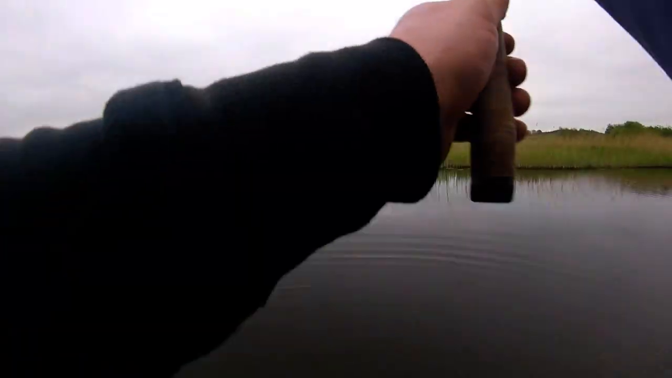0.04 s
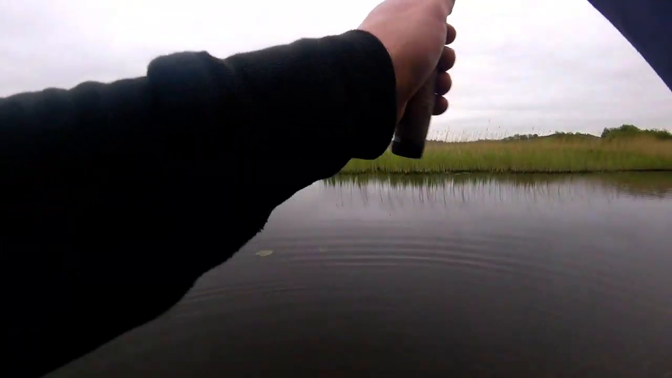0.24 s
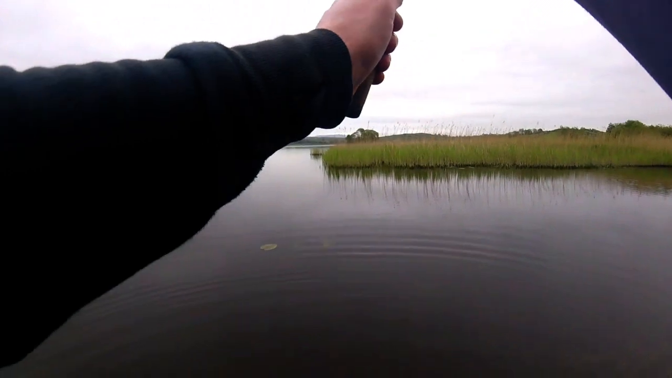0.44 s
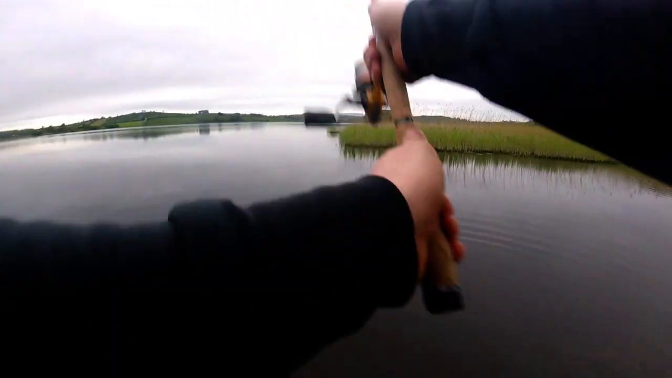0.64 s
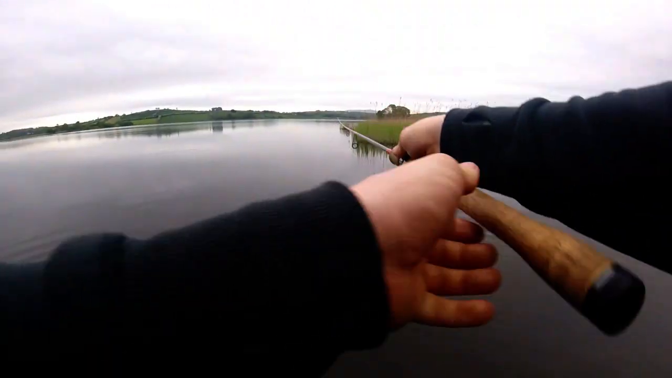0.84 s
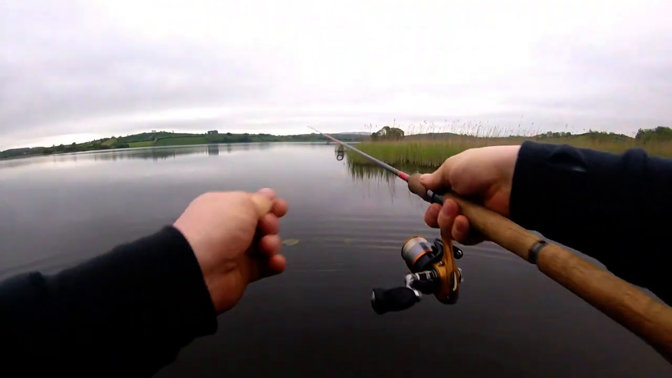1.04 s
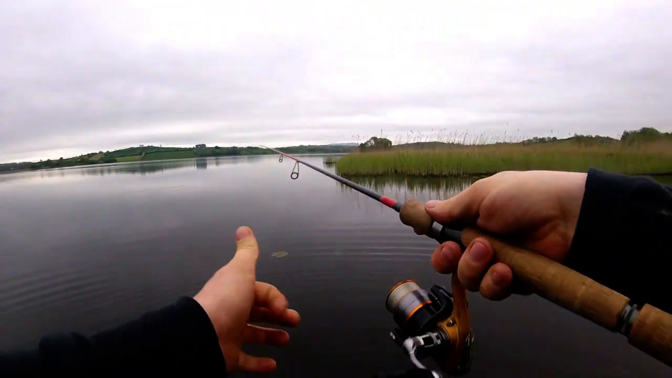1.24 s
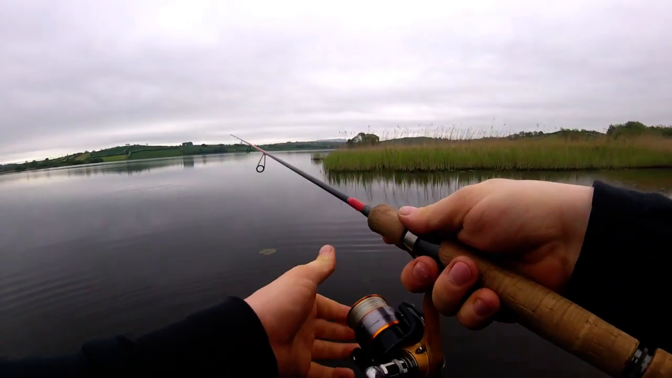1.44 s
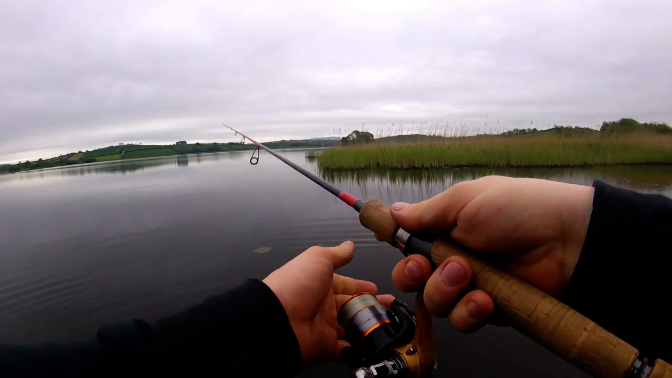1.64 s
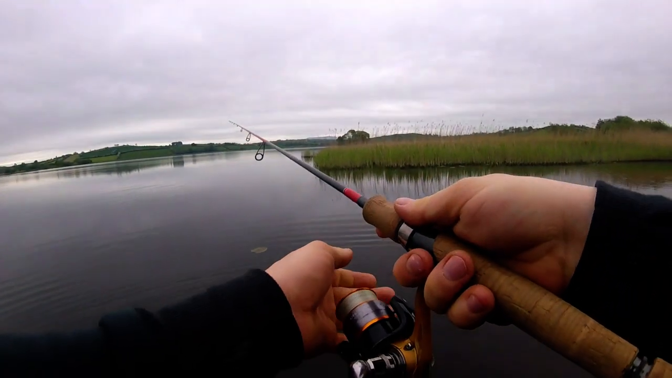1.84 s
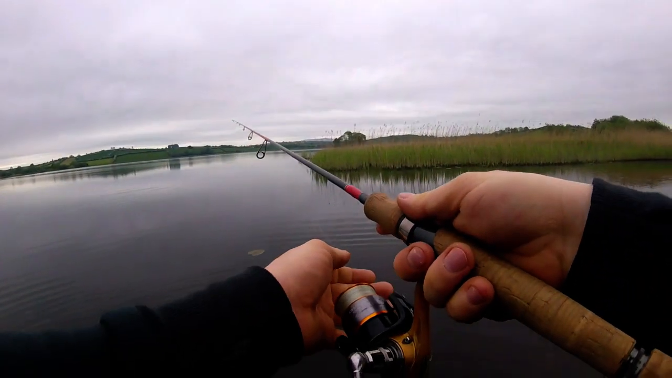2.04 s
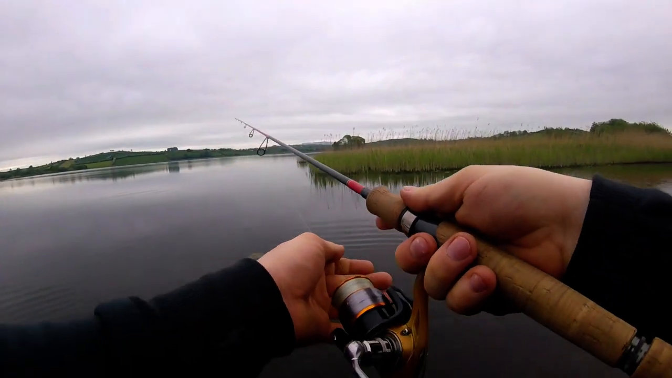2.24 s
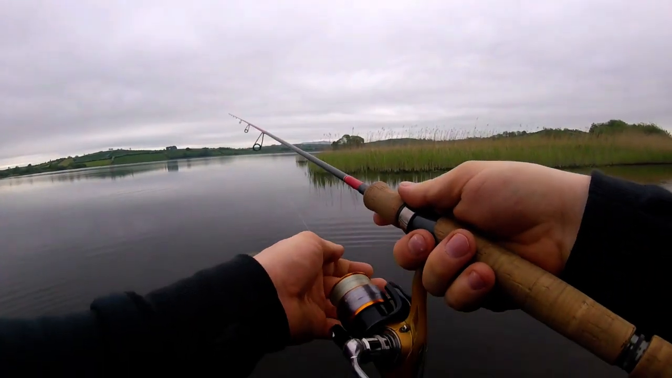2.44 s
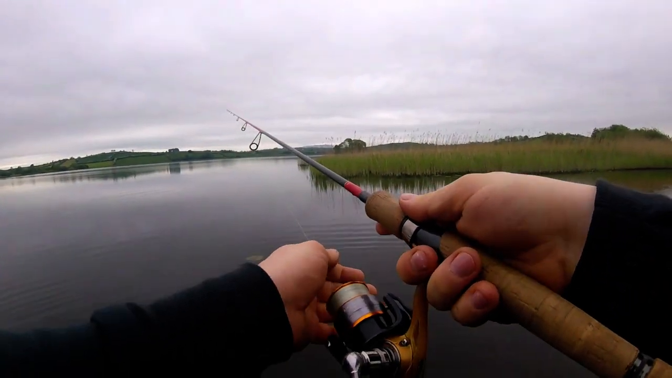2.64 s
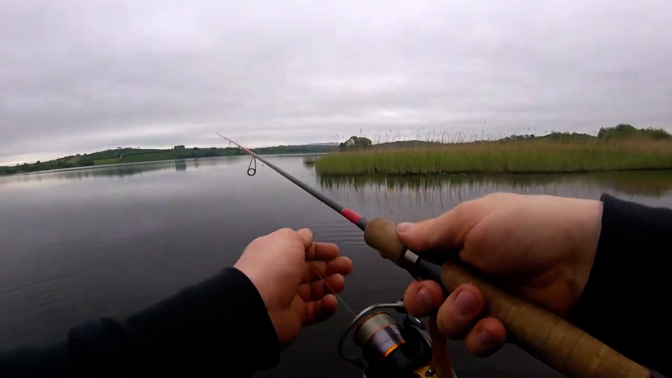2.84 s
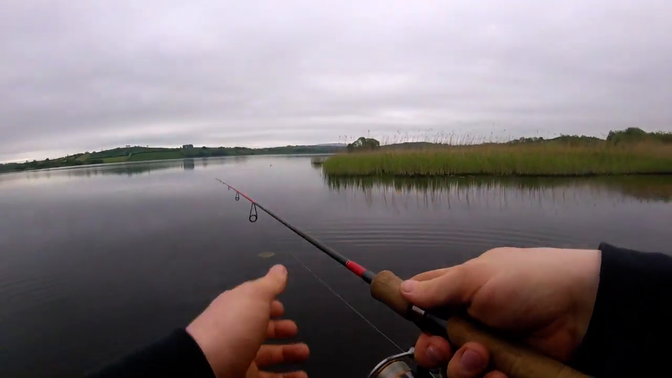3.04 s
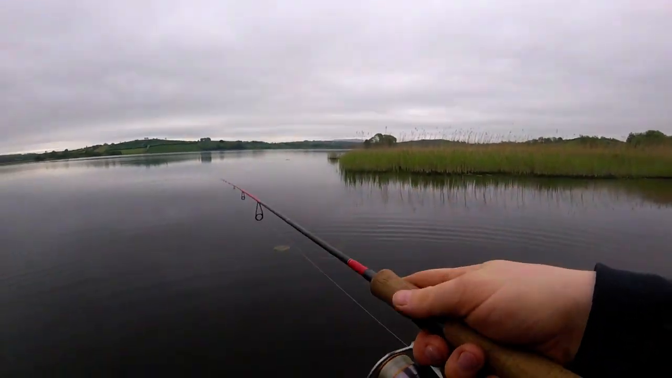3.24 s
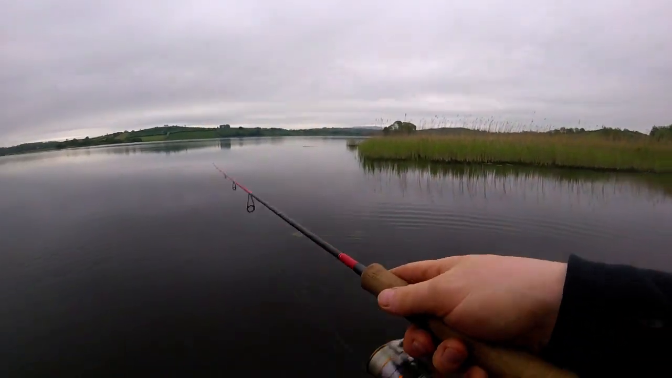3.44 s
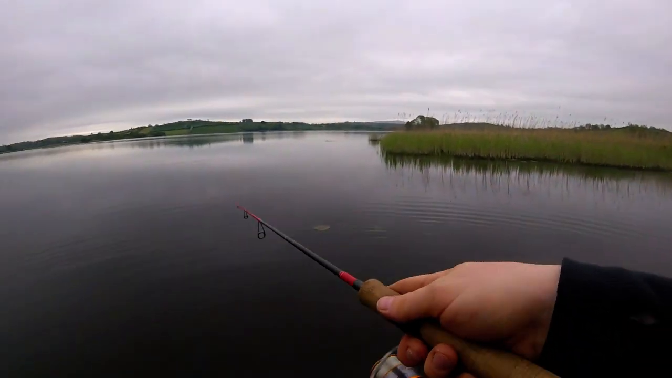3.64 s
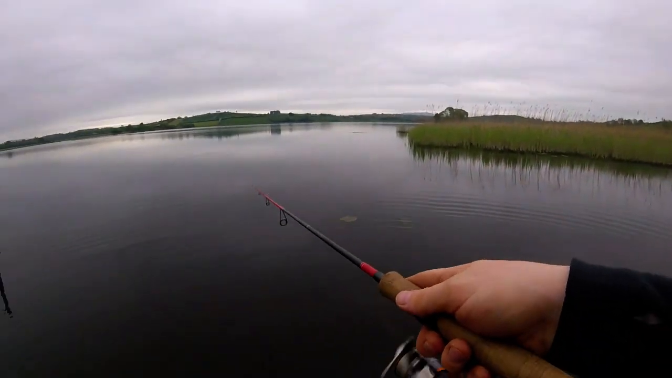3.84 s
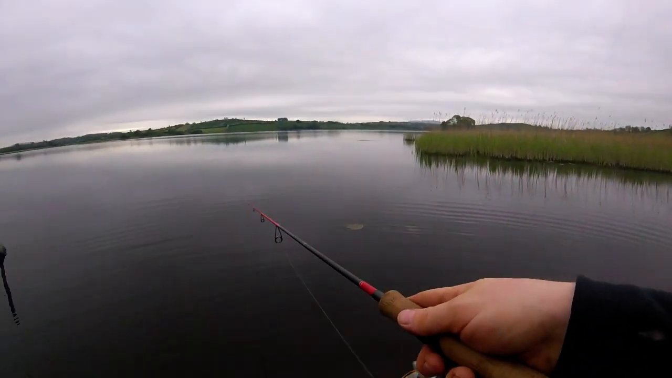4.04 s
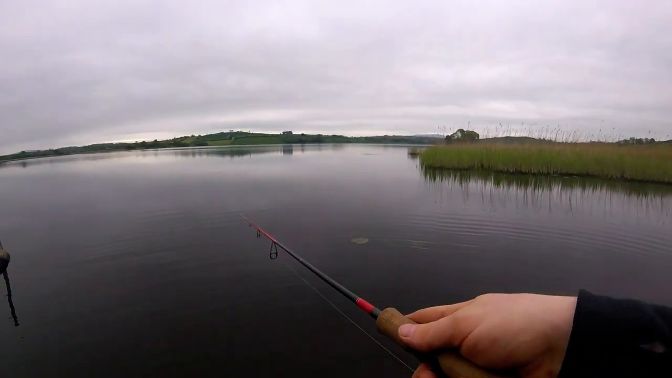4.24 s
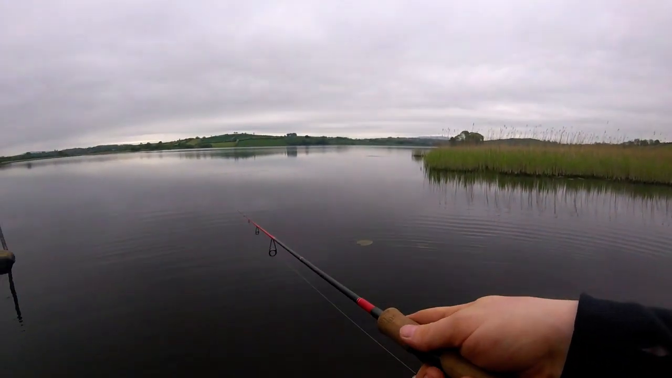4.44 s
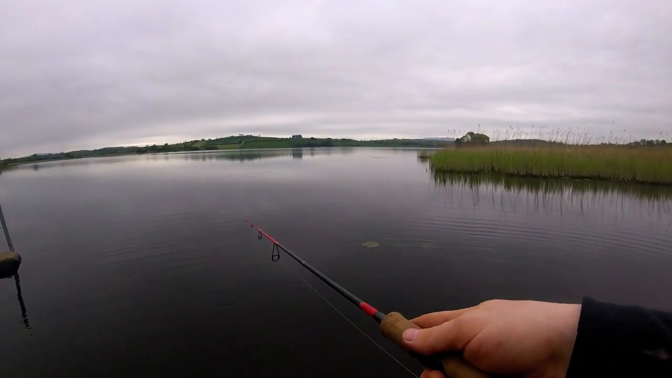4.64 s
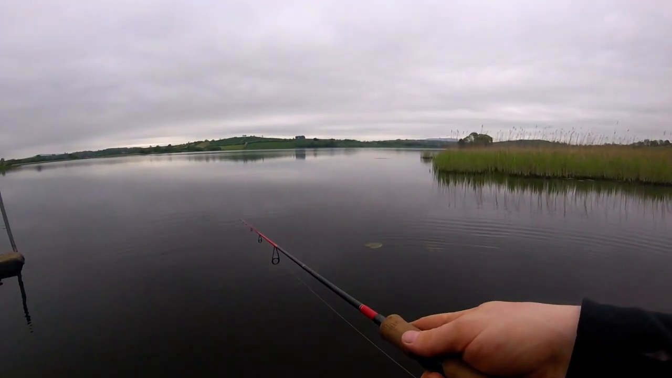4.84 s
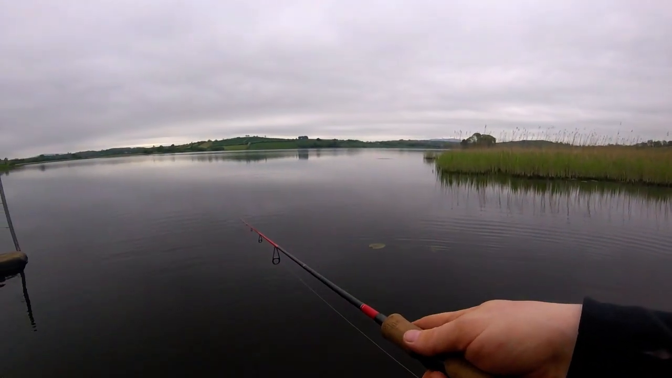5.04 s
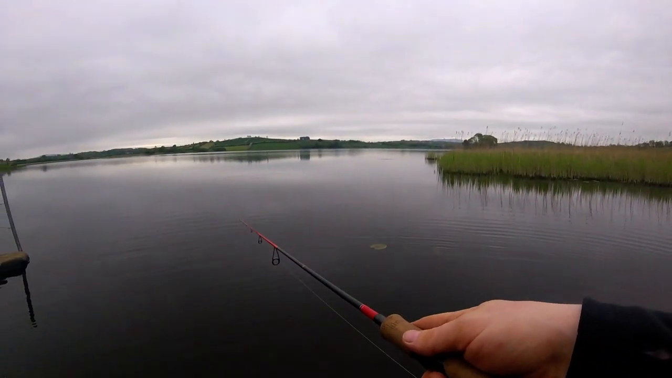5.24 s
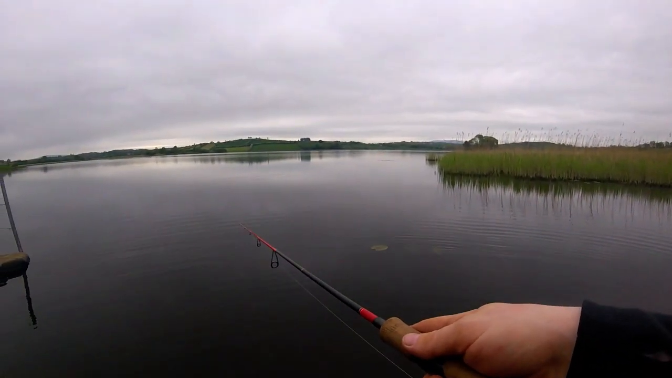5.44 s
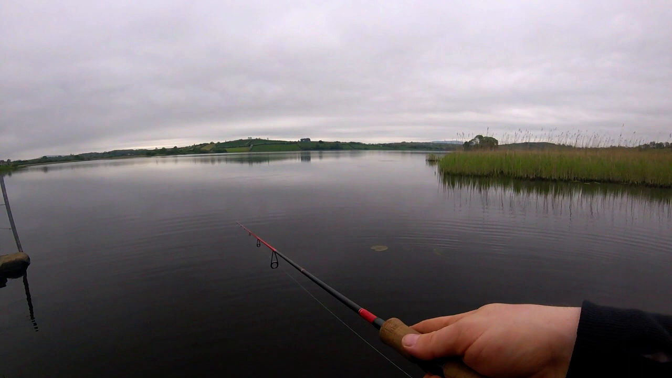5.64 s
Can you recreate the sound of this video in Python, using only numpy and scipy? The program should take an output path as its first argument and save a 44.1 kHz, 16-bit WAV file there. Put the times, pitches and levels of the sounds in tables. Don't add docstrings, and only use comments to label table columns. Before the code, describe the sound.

Close, wind-buffeted outdoor recording of a cast over still water. Sleeves rustle softly, the handle knocks, the rod whips and line slaps the guides in a quick crackle. Line sings very faintly off the spool with sparse clicks, while a small bird trills. The reel bail slams with a rattling metal clatter, then faint taps, soft wind rumble and fluting birds continue.

```python
import sys
import numpy as np
from scipy import signal
from scipy.io import wavfile
from scipy.ndimage import uniform_filter1d

SR = 44100
rng = np.random.default_rng(int(sys.argv[2]) if len(sys.argv) > 2 else 0)


def master(y):
    cut = np.clip(np.atleast_2d(y).T, -1, 1)
    pcm = np.round(cut * 32767)
    wavfile.write(sys.argv[1], SR, pcm.astype(np.int16))


def decibels_to_gain(level_db):
    exponent = np.asarray(level_db, float) / 20
    return 10 ** exponent


N = 251370

# (peak time [s], peak level [dB], rise per 10 dB [s], fall per 10 dB [s])
GUSTS = [(.17, -40, .1, .06), (.28, -40, .03, .2), (.56, -47, .2, .15), (.76, -33.5, .035, .055),
         (1.0, -33, .09, .045), (1.09, -43, .04, .1), (1.19, -41, .1, .06), (1.36, -38.5, .13, .15),
         (1.475, -32, .1, .06), (1.84, -49, .2, .1), (2.28, -42.5, .1, .07), (2.51, -48, .15, .1),
         (2.72, -48, .1, .05), (2.8, -44, .04, .3), (3.04, -47, .05, .2), (3.43, -41.5, .07, .11),
         (3.68, -35, .05, .04), (3.82, -36, .07, .35), (4.17, -37, .13, .05), (4.29, -38.5, .05, .5),
         (4.62, -39.5, .5, .15), (4.97, -43, .15, .1), (5.16, -43, .15, .2), (5.34, -44, .06, .25),
         (5.7, -43, .4, .1)]
# (peak time [s], peak level [dB], rise per 10 dB [s], fall per 10 dB [s])
SLEEVES = [(0, -53, .1, .06), (.47, -49, .3, .3), (.85, -50.5, .15, .45), (1.4, -58, .5, .2),
           (1.82, -60, .15, .08), (2.3, -63, .5, .6), (3.17, -49.5, .19, .11), (3.34, -57.5, .05, .07),
           (3.78, -61, .3, .08), (4.38, -63, .6, .5), (5.7, -63, .2, .1)]
# (peak time [s], peak level [dB], rise per 10 dB [s], fall per 10 dB [s])
FAR_SONG = [
    (1.2, -62.5, 1.1, 1.0),
    (1.68, -64, .5, .3),
    (2.78, -66, 2.0, .15),
    (3.15, -72, .4, .8),
    (3.71, -74, .4, .5),
    (4.78, -74, .9, .6),
    (5.7, -75, .6, .1),
]
GUST_REST_DB, SLEEVE_REST_DB, FAR_SONG_REST_DB = -50.5, -65, -82
# (frequency [Hz], density [dB per Hz])
RUMBLE = [(12, -29), (20, -1), (43, 4.5), (62, -1), (97, -6), (125, -14.5), (265, -30.5), (300, -35.5),
          (390, -77), (660, -120)]
# (frequency [Hz], density [dB per Hz])
ROAR = [(76, -44), (130, 1.5), (400, -3.5), (640, -6), (1600, -19.5), (1880, -22.5), (2500, -30),
        (3250, -57.5), (5500, -120)]
# (frequency [Hz], density [dB per Hz])
CHORUS = [(1500, -68), (2500, -2), (3500, -8.5), (4800, -2.5), (5800, -1.5), (6500, -8), (9000, -51)]
# (frequency [Hz], density [dB per Hz])
HISS = [(180, -33), (300, -2), (413, -4.5), (684, -7), (834, -4), (900, -5), (1610, -8.5), (2250, -9.5),
        (3240, -13), (4400, -24), (5950, -13.5), (6500, -1.5), (6950, -9), (10800, -21.5), (11500, -34),
        (15000, -67), (22000, -120)]
HISS_DB = -61

# (time [s], pitch [Hz], level [dB])
FLUTING = [
    [(4.933, 2720, -59.5), (4.957, 2830, -64), (5.003, 2530, -55), (5.055, 2260, -56), (5.123, 2020, -65),
     (5.14, 2108, -71)],
    [(5.3, 2680, -61), (5.324, 2500, -60), (5.37, 2390, -57), (5.436, 2310, -55.5), (5.46, 2274, -57),
     (5.586, 2213, -57.5), (5.63, 2196, -69)],
    [(.25, 1600, -74), (.33, 1760, -69), (.4, 1830, -70), (.43, 1840, -61.5), (.51, 1835, -61),
     (.52, 1830, -68)],
    [(.634, 1880, -59), (.66, 2130, -56), (.683, 2330, -54), (.698, 2350, -55)],
    [(1.966, 4780, -68), (1.985, 4450, -62), (2.0, 4320, -63.5), (2.03, 4330, -64)],
    [(4.685, 1700, -76), (4.72, 1850, -68), (4.745, 1850, -66), (4.755, 1780, -77), (4.8, 1650, -79)],
]
# (start [s], stop [s], depth [0-1])
STUTTER = [
    (5.298, 5.412, .9),
]
# (time [s], length [s], start [Hz], end [Hz], last swing [Hz], level [dB])
WARBLES = [
    (5.113, .085, 2200, 2450, 420, -64),
]
WARBLE_RATE_HZ = 76
# (time [s], length [s], start [Hz], end [Hz], level [dB])
HELD = [
    (0, .04, 2150, 2050, -63),
    (.275, .13, 3650, 3980, -71),
    (.225, .025, 3600, 3800, -72),
    (.6, .028, 2280, 2520, -60),
    (.827, .081, 2580, 2470, -53),
    (4.395, .21, 2410, 2530, -69),
    (1.466, .03, 6440, 5930, -62),
    (1.627, .038, 2840, 2530, -69),
    (.08, .44, 488, 480, -61.5),
]
# (time [s], length [s], start [Hz], end [Hz], level [dB])
SLIDES = [(.071, .056, 6200, 3500, -69), (.23, .047, 6200, 3550, -66), (.383, .06, 6000, 3300, -68),
          (3.283, .082, 5900, 3140, -62), (2.9, .075, 3450, 3200, -77), (4.243, .016, 4900, 4750, -64),
          (4.256, .022, 4750, 3400, -66), (4.513, .04, 6100, 3800, -66.5), (4.708, .05, 6400, 3750, -65),
          (4.92, .048, 6100, 3650, -64.5), (4.03, .08, 2110, 1620, -72), (1.595, .017, 5670, 6300, -65),
          (1.777, .025, 6000, 6500, -62.5), (2.971, .035, 3270, 5600, -66.5), (4.28, .023, 3800, 6000, -64),
          (4.462, .024, 5100, 5800, -63.5), (4.655, .035, 5000, 5900, -60),
          (4.862, .034, 4960, 5820, -58.5), (5.31, .11, 1900, 2300, -71), (5.268, .02, 2850, 3050, -76),
          (4.845, .08, 1620, 1860, -71.5), (5.65, .05, 2226, 2283, -70)]
# (time [s], length [s], end pitch [Hz], turning pitch [Hz], level [dB])
DIPS = [
    (.976, .061, 5820, 5480, -64),
    (1.27, .046, 6830, 6780, -63),
    (1.642, .047, 6780, 5850, -63),
    (1.827, .038, 6450, 5800, -62),
    (5.582, .026, 3100, 3270, -70),
]
SETTLE, SAG = .76, .03
# (first chip [s], spacing [s])
TRILL = (2.069, .0579)
TRILL_DB = [-67, -66.5, -65.5, -67.5, -67.5, -68, -69, -67, -68.5, -68.5, -69, -73, -70]
# (length [s], start [Hz], middle [Hz], end [Hz])
CHIP = (.019, 5500, 4330, 3980)
# (length [s], start [Hz], middle [Hz], end [Hz])
GRACE = (.006, 4700, 5000, 5300)
GRACE_LEAD_S, CHIP_SCATTER = .0055, .012
# (time [s], length [s], centre [Hz], width [Hz], level [dB])
BREATHY = [
    (.4, .17, 630, 90, -63),
    (3.63, .2, 5000, 600, -72),
]
NOTE_FADE_S = .007

# (time [s], peak level [dB], ring [Hz], t60 [s])
KNOCKS = [(.6375, -14.5, 870, 0.008), (.6372, -26, 520, .01), (.639, -31, 1265, 0.016),
          (.642, -38, 950, .03), (.553, -46, 520, .02), (0.7186, -34, 58.7, 0.22), (0.7185, -33, 170, 0.05),
          (.7196, -21, 635, 0.022), (.7204, -25, 880, .016), (0.719, -27, 1400, 0.02),
          (0.7438, -31, 1780, 0.025), (.006, -47, 635, 0.061), (1.505, -43, 162, 0.032),
          (3.326, -46.5, 504, .04), (3.661, -39, 122, 0.088), (4.485, -29, 120.4, 0.051),
          (5.483, -33, 266, 0.018), (5.483, -44, 600, 0.023)]
# (time [s], peak level [dB], centre [Hz], t60 [s])
TICKS = [
    (.719, -43, 5500, .02),
    (.7571, -38, 8500, .005),
    (.79, -42, 7000, .012),
    (.8705, -34, 5400, .009),
    (.871, -40, 2000, .016),
    (1.406, -48, 5500, .03),
    (1.744, -47, 5500, .017),
    (3.305, -49, 6360, .036),
    (3.333, -44, 5200, .026),
]
# (time [s], peak level [dB], centre [Hz], t60 [s])
PINGS = [(.71, -48, 4000, .008), (.735, -38, 6500, .012), (.7435, -34, 2300, .012),
         (.7569, -24, 5500, .007), (.605, -54, 5000, .02), (.793, -42, 6400, .05), (.845, -44, 4730, .018),
         (1.455, -58, 5200, .02), (2.738, -57, 3800, .017), (3.287, -47, 2220, .04),
         (3.289, -45, 6300, .06), (3.343, -52, 6300, .027)]
# (time [s], peak level [dB], centre [Hz], t60 [s])
CLACKS = [
    (.816, -36.5, 5030, .011),
    (1.151, -42, 4540, .017),
    (1.252, -36.5, 4600, .01),
    (1.365, -47, 4500, .022),
    (1.51, -41.5, 5500, .02),
    (2.712, -37.5, 2400, .018),
    (3.323, -47, 3480, .02),
    (3.327, -38, 4370, .02),
    (4.27, -53, 4000, .02),
]
# (time [s], peak level [dB], centre [Hz], t60 [s])
CRACKLE = [(.6665, -42, 3200, .007), (.762, -48, 8200, .01), (.7318, -41, 2500, .008),
           (.732, -42, 3600, .008), (.7362, -42, 1700, .01), (.7395, -42, 3800, .012),
           (.7462, -40, 4000, .01), (.747, -34, 2500, .008), (.75, -40, 4100, .008),
           (.7505, -38, 2600, .008), (.7522, -41, 5400, .008), (.7527, -36, 4300, .01),
           (.7608, -40, 3900, .01), (.7672, -38, 1400, .04), (.7675, -39, 2600, .01),
           (.775, -41, 2600, .01), (.7845, -42, 2600, .01), (.791, -39, 2600, .01), (.798, -41, 2500, .012),
           (.802, -43, 5800, .01), (.8025, -40, 2600, .01), (.8063, -43, 2600, .01), (.81, -43, 5600, .01),
           (.811, -42, 2600, .008), (.813, -42, 5500, .008), (.8165, -36, 2600, .008),
           (.8187, -40, 2600, .012), (.8205, -43, 5500, .015)]
TICK_WIDTH_HZ, PING_WIDTH_HZ, CLACK_WIDTH_HZ, CRACKLE_WIDTH_HZ = 2500, 1250, 4300, 800

# (peak time [s], peak level [dB], rise per 10 dB [s], fall per 10 dB [s])
SWISH = [
    (.735, -48, .006, .04),
    (.749, -48, .015, .02),
    (.785, -52.5, .06, .08),
    (.822, -52, .04, .008),
]
# (centre [Hz], width [Hz], level [dB])
BLANK = [(1400, 370, 7), (1750, 440, 2), (2600, 420, 9), (4100, 900, -8), (5500, 770, 5), (6500, 360, -8),
         (8300, 1500, -17)]
# (start [s], stop [s])
SWISH_SPAN = (.715, .9)

# (peak time [s], peak level [dB], rise per 10 dB [s], fall per 10 dB [s])
SPOOL = [
    (1.18, -72, .15, .2),
    (1.36, -74, .1, .2),
    (1.525, -65.5, .015, .11),
]
# (start [s], stop [s])
SPOOL_SPAN = (1.04, 1.61)
SPOOL_HZ = 4760

# (time [s], peak level [dB], t60 [s], thud level [dB], wire mode [Hz])
BAIL = [(2.793, -43, .03, -10, 6400), (2.7959, -23, .01, -16, 5900), (2.8011, -30, .008, -9, 3500),
        (2.8018, -26, .012, -12, 6500), (2.8043, -33, .012, -12, 3500), (2.8082, -32, .015, -12, 6500),
        (2.81, -22, .008, -20, 6800), (2.8108, -16, .008, -10, 5800), (2.8112, -5, .005, -14, 6200),
        (2.8126, -10.5, .015, -9, 6600), (2.8142, -12, .008, -12, 3800), (2.8148, -10, .012, -12, 5600),
        (2.8166, -7, .006, -17, 6500), (2.8176, -14, .011, -12, 5250), (2.8205, -23, .012, -8, 6000),
        (2.822, -22, .012, -8, 6900), (2.8237, -22, .015, -8, 6300), (2.8279, -20, .01, -12, 6500),
        (2.8289, -22, .015, -8, 4900), (2.8323, -28, .012, 4, 6400), (2.8339, -26, .015, 6, 6500),
        (2.8363, -31, .012, 6, 6500), (2.8418, -32, .015, 6, 6300), (2.8445, -35, .015, 6, 5900),
        (2.853, -48, .03, 10, 6400), (2.865, -45, .022, -4, 6400), (2.873, -46, .02, -10, 5500),
        (2.881, -48, .037, -10, 6400)]
# (frequency [Hz], density [dB per Hz])
WIRE = [(120, -43), (220, -16), (470, -13.5), (850, -16), (1500, -11.5), (2260, -10), (3050, -22),
        (3500, -13), (4400, -13), (5300, -4), (6460, 0.5), (7900, -12.5), (10300, -14), (11500, -25),
        (15000, -80)]
# (ring [Hz], peak level [dB], t60 [s])
REEL = [(480, -30, .06), (1050, -34, .035), (1600, -33, .03), (2000, -33, .035), (2270, -30, .04),
        (3480, -31, .025), (3910, -33, .035), (5270, -29, .03)]

# (low edge [Hz], high edge [Hz], level [dB], share of time [0-1])
PARTED = [(1950, 2900, -12.5, .9), (3450, 4400, -14, .5), (6900, 8450, -9, .75), (9000, 10050, -15, .5)]
EDGE_HZ = 11250


def evened(x):
    return x / np.sqrt(np.mean(x ** 2) + 1e-20)


def read(points, hz):
    f, value = np.transpose(points)
    return np.interp(np.log(hz + 1), np.log(f + 1), value)


def add(mix, s, sound):
    part = mix[round(s * SR):][:len(sound)]
    part += sound[:len(part)]


def chance(size):
    return rng.standard_normal(30000)[:size]


def resonate(x, hz, width):
    b, a = signal.iirpeak(min(hz, 20000), max(hz / width, .3), SR)
    return signal.lfilter(b, a, x)


def dull(x, hz):
    b, a = signal.butter(3, min(hz, 20000), fs=SR)
    return signal.lfilter(b, a, x)


def swells(t, rows, rest_db):
    power = decibels_to_gain(rest_db) ** 2
    for s, db, rise, fall in rows:
        tens_down = np.where(t < s, (s - t) / rise, (t - s) / fall)
        power = power + decibels_to_gain(db - 10 * tens_down) ** 2
    return 10 * np.log10(power)


def noise(spectrum, patchy_db, size):
    hz = np.fft.rfftfreq(size, 1 / SR)
    a, b, patches = rng.standard_normal((4 * N // size + 8, len(hz), 3)).T
    patches = uniform_filter1d(patches, size=12, axis=0)
    patches = evened(uniform_filter1d(patches, size=6, axis=1))
    z = (a + 1j * b) * decibels_to_gain(read(spectrum, hz)[:, None] + patchy_db * patches)
    return evened(signal.istft(z, nperseg=size, noverlap=3 * size // 4)[1][:N])


def air():
    t = np.arange(N) / SR
    rumble = decibels_to_gain(swells(t, GUSTS, GUST_REST_DB)) * noise(RUMBLE, patchy_db=1.0, size=2048)
    roar = decibels_to_gain(swells(t, SLEEVES, SLEEVE_REST_DB) + 1.4) * noise(ROAR, patchy_db=1.8, size=1024)
    chorus = decibels_to_gain(swells(t, FAR_SONG, FAR_SONG_REST_DB) - 3.5) * noise(CHORUS, patchy_db=4.0, size=512)
    hiss = decibels_to_gain(HISS_DB) * noise(HISS, patchy_db=1.6, size=1024)
    return rumble + roar + chorus + hiss


def whistle(hz, db, edge):
    flutter = decibels_to_gain(1.7 * evened(uniform_filter1d(chance(len(hz)), size=250)))
    waver = 1 + 0.0031 * evened(uniform_filter1d(chance(len(hz)), size=200))
    tone = np.sqrt(2) * np.sin(2 * np.pi * np.cumsum(hz * waver) / SR)
    return decibels_to_gain(db) * flutter * tone * signal.windows.tukey(len(hz), edge)


def slide(length, start_hz, middle_hz, end_hz, db, tilt_db=15.0):
    u = np.linspace(0, 1, round(length * SR))
    bend = np.polyfit([0, .5, 1], [start_hz, middle_hz, end_hz], 2)
    hz = np.polyval(bend, u)
    return whistle(hz, db + tilt_db * np.log2(hz / middle_hz), min(2 * NOTE_FADE_S / length, .35))


def fluted(rows):
    s, hz, db = np.transpose(rows)
    t = np.arange(s[0], s[-1], 1 / SR)
    (start, stop, depth), = STUTTER
    inside = (t > start) * (t < stop)
    chop = 1 - depth * inside * np.cos(np.pi * WARBLE_RATE_HZ * (t - start)) ** 4
    return s[0], chop * whistle(np.interp(t, s, hz), np.interp(t, s, db), 0.059)


def warble(length, from_hz, to_hz, swing_hz, db):
    t = np.arange(round(length * SR)) / SR
    swing = swing_hz * np.linspace(.35, 1, len(t)) * -np.cos(2 * np.pi * WARBLE_RATE_HZ * t)
    return whistle(np.linspace(from_hz, to_hz, len(t)) + swing, db, 0.16)


def fuzzy(length, hz, width, db):
    x = chance(round(length * SR))
    band = resonate(resonate(x, hz, width), hz, width)
    return decibels_to_gain(db) * evened(band) * signal.windows.tukey(len(x), .4)


def trill():
    first, spacing = TRILL
    notes = []
    for k, db in enumerate(TRILL_DB):
        bend, flick = rng.standard_normal(2)
        s = first + spacing * k
        lift = 1 + CHIP_SCATTER * bend
        notes.append((s, CHIP[0], *(lift * np.array(CHIP[1:])), db, -7.0))
        notes.append((s - GRACE_LEAD_S, *GRACE, db + 2.0 + 2.5 * flick))
    return notes


def songs():
    held = [(s, length, a, a + SETTLE * (b - a), b, db) for s, length, a, b, db in HELD]
    slides = [(s, length, a, (a + b) / 2 - SAG * abs(b - a), b, db) for s, length, a, b, db in SLIDES]
    dips = [(s, length, a, b, a, db) for s, length, a, b, db in DIPS]
    return held + slides + dips + trill()


def birds():
    out = np.zeros(N)
    for rows in FLUTING:
        add(out, *fluted(rows))
    for s, *shape in songs():
        add(out, s, slide(*shape))
    for s, *shape in WARBLES:
        add(out, s, warble(*shape))
    for s, *shape in BREATHY:
        add(out, s, fuzzy(*shape))
    reeds = rng.standard_normal(6000) * decibels_to_gain(-60 * np.arange(6000) / SR / 0.27)
    return out + decibels_to_gain(-13) * signal.fftconvolve(out, reeds / np.linalg.norm(reeds))[:N]


def knock(db, hz, t60):
    t = np.arange(9000) / SR
    ring = np.sin(2 * np.pi * hz * t) + 0.15 * np.sin(2 * np.pi * 1.35 * hz * t)
    return decibels_to_gain(db + 2.5 - 60 * t / t60) * (1 - np.exp(-t / 0.0008)) ** 2 * ring


def burst(t60, rise=0.0002):
    t = np.arange(2600) / SR
    return rng.standard_normal(2600) * (1 - np.exp(-t / rise)) * decibels_to_gain(-60 * t / max(t60, .003))


def tick(db, hz, width, t60):
    puff = burst(t60)
    puff[5] += 1.4
    snap = resonate(puff, hz, width)
    port = resonate(snap, 5300, 900)
    snap = dull(resonate(snap, hz, 2 * width) + 0.35 * port, 7500)
    return decibels_to_gain(db) * snap / abs(snap).max()


def swish():
    t = np.arange(*SWISH_SPAN, 1 / SR)
    bands = 0
    for hz, width, band_db in BLANK:
        grain = decibels_to_gain(3.0 * evened(uniform_filter1d(chance(len(t)), size=70)))
        band = resonate(grain * chance(len(t)), hz, width)
        bands = bands + decibels_to_gain(band_db) * resonate(band, hz, 4.5 * width)
    return t[0], decibels_to_gain(swells(t, SWISH, rest_db=-75)) * evened(bands)


def spool():
    t = np.arange(*SPOOL_SPAN, 1 / SR)
    return t[0], whistle(SPOOL_HZ + 0 * t, swells(t, SPOOL, rest_db=-84), .05)


def bail():
    gain = np.log(decibels_to_gain(np.maximum(read(WIRE, abs(np.fft.fftfreq(4096, 1 / SR))), -80)))
    body = np.fft.ifft(np.exp(np.conj(signal.hilbert(gain)))).real[:1024]
    out, shaking = np.zeros(N), np.zeros(N)
    for s, db, t60, thud_db, hz in BAIL:
        chatter = burst(t60)
        chatter[6] += 1.6
        wide = np.convolve(chatter, body)
        hit = 1.3 * evened(wide) + .7 * evened(resonate(wide, hz, 850))
        thud = resonate(wide, 450, 640)
        blow = hit / abs(hit).max() + decibels_to_gain(thud_db - 17) * thud / abs(thud).max()
        add(out, s, decibels_to_gain(db - 2.6) * blow)
        add(shaking, s, decibels_to_gain(db) * chatter)
    for hz, db, t60 in REEL:
        ring = resonate(shaking, hz, 2.2 / t60)
        out += decibels_to_gain(db) * ring / abs(ring).max()
    return out


def scene():
    mix = air() + bail()
    for s, *blow in KNOCKS:
        add(mix, s, knock(*blow))
    for rows, width in ((TICKS, TICK_WIDTH_HZ), (PINGS, PING_WIDTH_HZ),
                        (CLACKS, CLACK_WIDTH_HZ), (CRACKLE, CRACKLE_WIDTH_HZ)):
        for s, db, hz, t60 in rows:
            add(mix, s, tick(db, hz, width, t60))
    add(mix, *swish())
    add(mix, *spool())
    return np.array([mix, mix]) + birds()


def parting(x):
    hz, t, z = signal.stft(x, SR, nperseg=1024)
    turns = rng.random(z.shape)
    gain = np.zeros(z.shape)
    for low, high, db, share in PARTED:
        on = rng.random(len(t) // 2 + 1).repeat(2)[:len(t)] < share
        gain += decibels_to_gain(db) * np.outer((hz > low) & (hz < high), on)
    treble = abs(z[hz > 2000]).sum(0)
    loud = treble > .12 * treble.max()
    after = np.roll(loud, shift=2) & ~loud
    tail_band = (hz > 700) & (abs(hz - 2450) > 850)
    gain = np.maximum(gain, decibels_to_gain(-9) * np.outer(tail_band, after)) * ~loud
    return signal.istft(abs(z) * gain * np.exp(2j * np.pi * turns), SR, nperseg=1024)[1][:N]


def roll_off(x):
    return signal.sosfilt(signal.butter(12, 11680, fs=SR, output="sos"), x)


def record(dry):
    edge = signal.firwin(401, EDGE_HZ, window=("kaiser", 9), fs=SR)
    parted = dry + np.outer([1, -1], parting(dry[0]))
    limited = signal.oaconvolve(parted, edge[None], "same")
    return roll_off(limited)


dry = scene()
out = record(dry)
master(out)
```